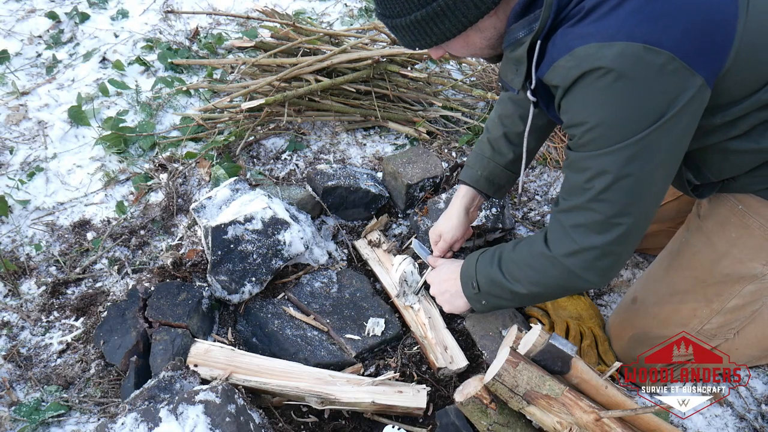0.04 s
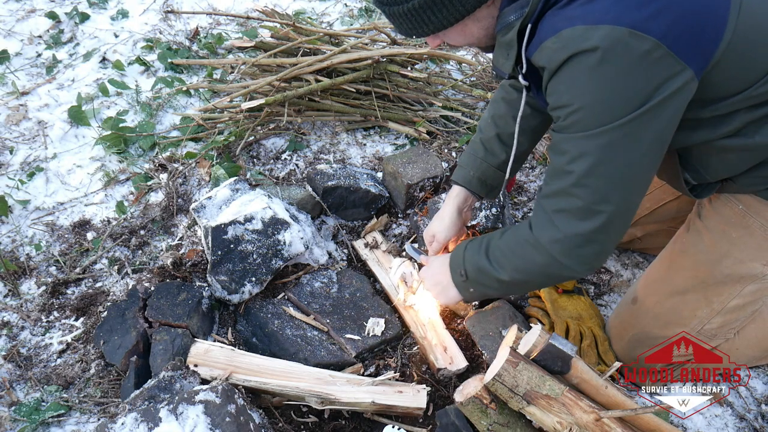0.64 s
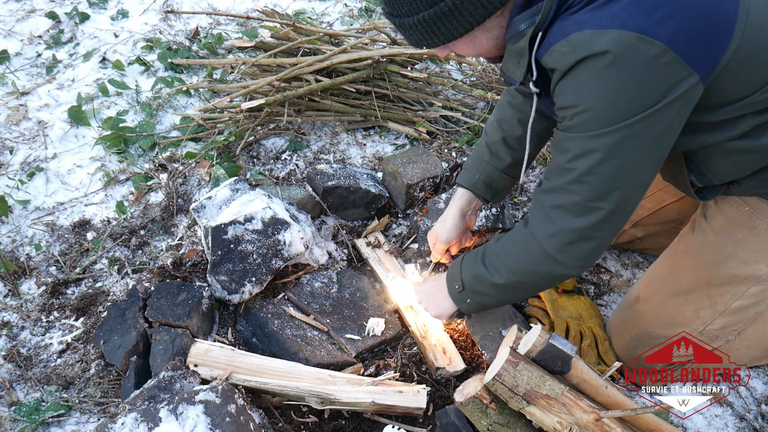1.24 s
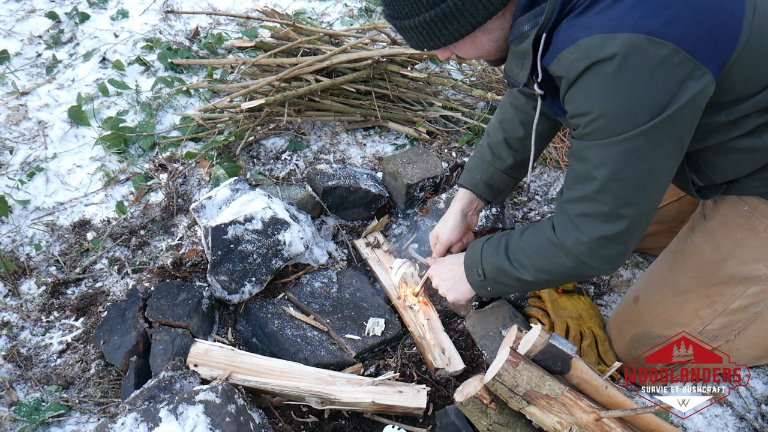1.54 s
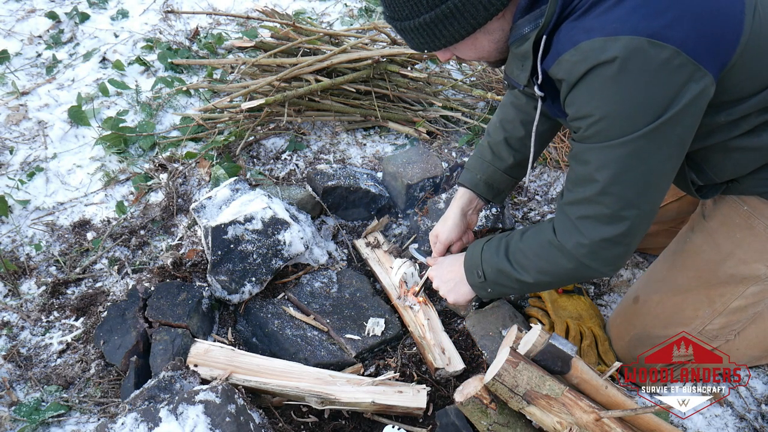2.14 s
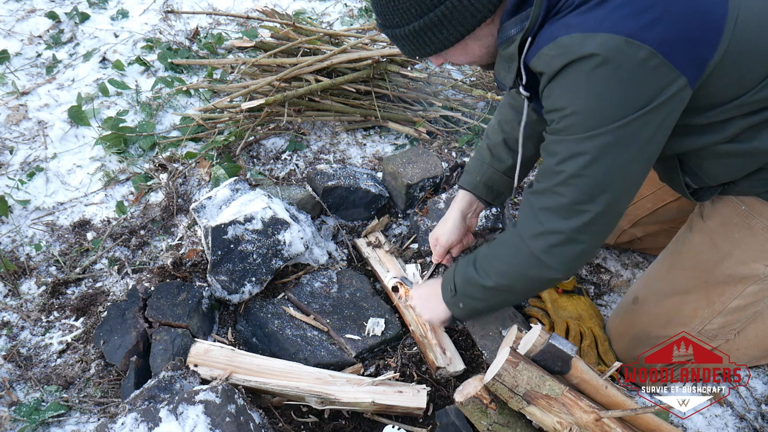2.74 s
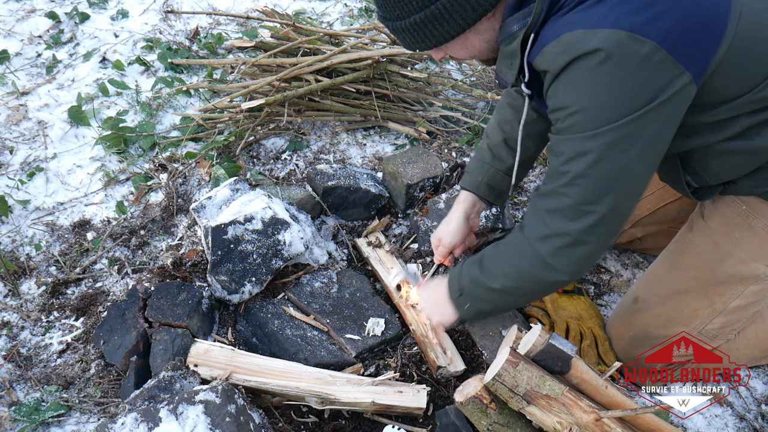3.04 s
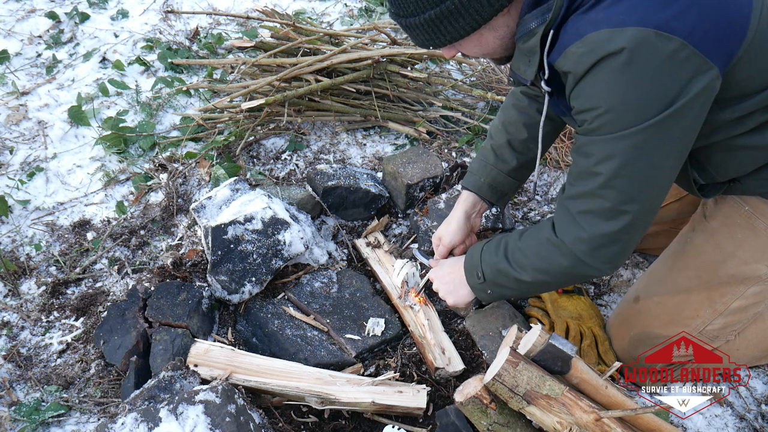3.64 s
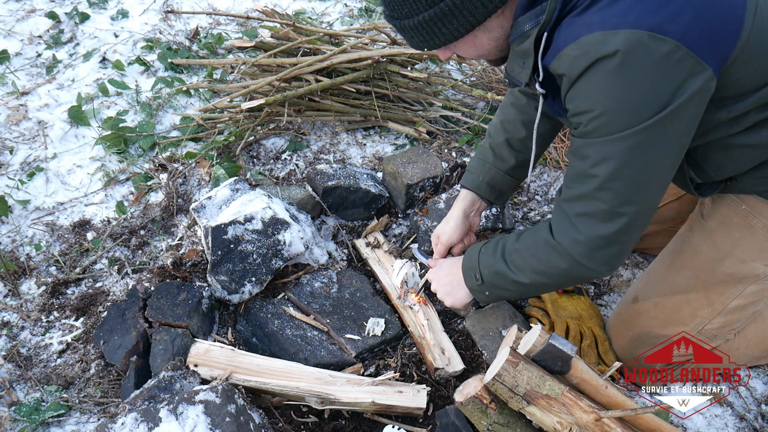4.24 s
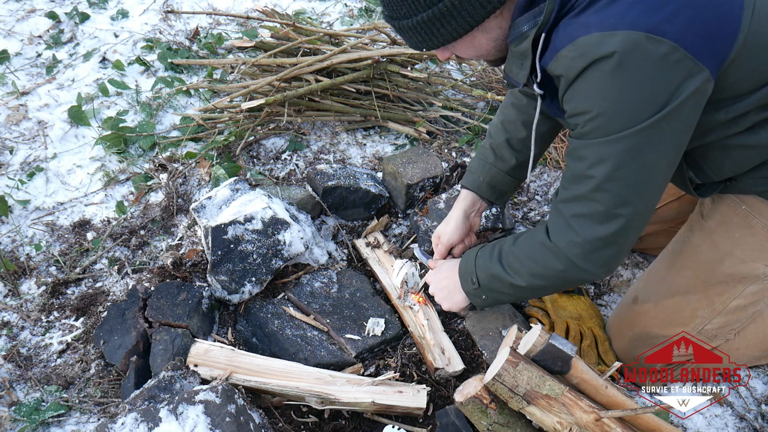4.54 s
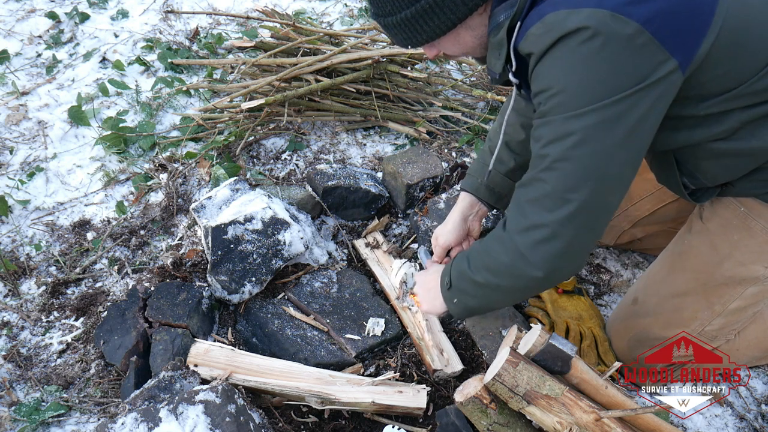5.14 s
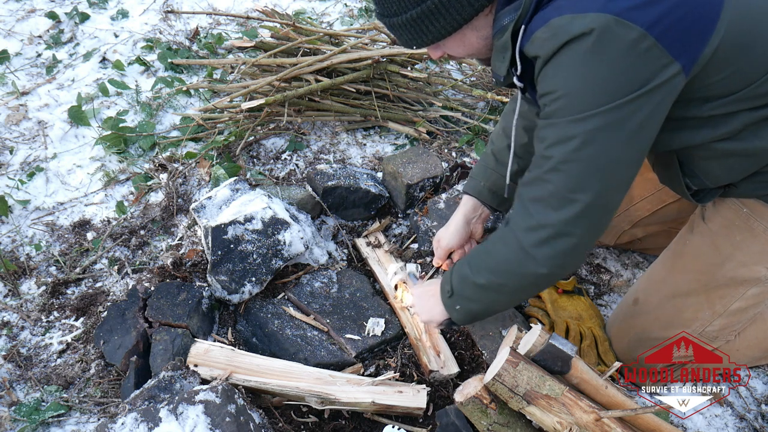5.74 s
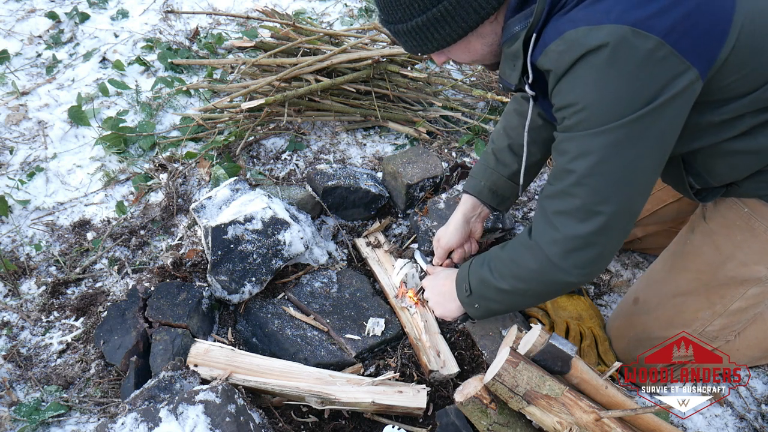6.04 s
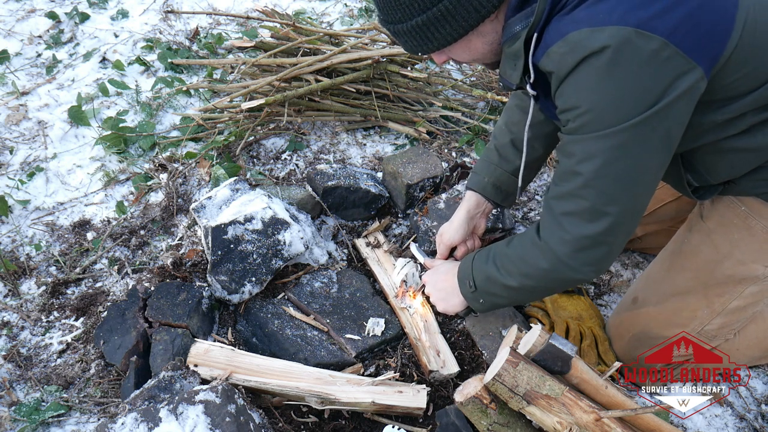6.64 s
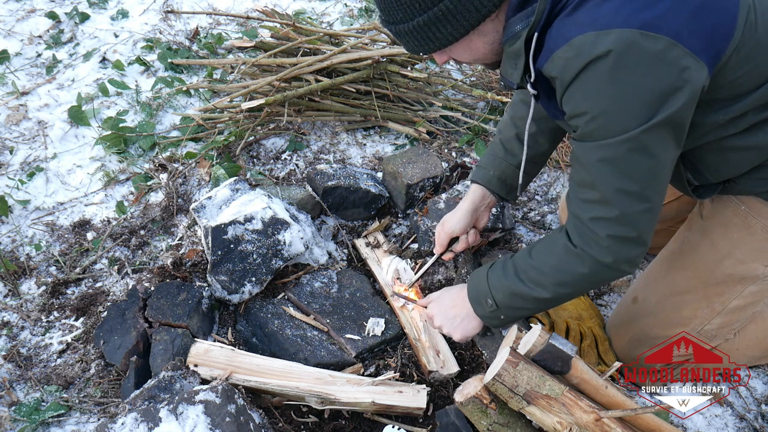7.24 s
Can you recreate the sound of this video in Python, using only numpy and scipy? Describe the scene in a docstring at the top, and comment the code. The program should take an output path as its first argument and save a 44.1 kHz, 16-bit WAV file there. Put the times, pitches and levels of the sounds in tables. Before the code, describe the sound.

Close, dry scraping of a blade shaving wood, pausing twice and ending in sharp clicks, over a faint fading wind.

```python
"""Someone kneels in a snowy wood, scraping sparks into the curls on a split stick; all is close and dry.
At first a light wind rumbles and fades while the knife rasps, judders (sticks and slips) and catches
with short knocks. Around 2 s the loose shavings tick as they settle. Near 3 s comes a second bout, with
snapping fibres and the stick bumping the ground. A sleeve shifts in the pause, and a third bout runs
from about 5 to 6 s. Last come a few sharp clicks as the knife is set against the wood."""
import sys
import numpy as np
from scipy import signal
from scipy.fft import rfft, irfft, next_fast_len
from scipy.io import wavfile
from scipy.ndimage import uniform_filter1d

SR = 44100
rng = np.random.default_rng(int(sys.argv[2]) if len(sys.argv) > 2 else 0)


def transcribe(signal):
    """Save signal, clipped to [-1, 1], as a 16-bit WAV file at the path in sys.argv[1]."""
    frames = np.atleast_2d(signal).T
    limited = np.clip(frames, -1, 1)
    pcm = np.round(limited * 32767).astype(np.int16)
    wavfile.write(sys.argv[1], SR, pcm)


N = 325899
LOW_EDGE_HZ, TOP_EDGE_HZ = 1450, 7240   # where lows, middle and treble meet


def amp(db):
    """Turn decibels into a number to multiply by."""
    return 10 ** (np.asarray(db) / 20)


def rms(x):
    """The average strength of a signal (root mean square)."""
    return np.sqrt(np.mean(x ** 2) + 1e-20)


def in_time(rows):
    """Join a table's rows with straight lines, giving each column a value at every sample."""
    s, *columns = np.transpose(rows)
    return [np.interp(np.arange(N) / SR, s, c) for c in columns]


def cut(x, hz, kind, order=4):
    """Keep the "low" or the "high" side of a frequency."""
    return signal.sosfilt(signal.butter(order, hz, kind, fs=SR, output="sos"), x + 1e-18)


def three_bands(x):
    """Split a sound into lows, middle and treble."""
    middle = cut(cut(x, LOW_EDGE_HZ, "high"), TOP_EDGE_HZ, "low")
    return cut(x, LOW_EDGE_HZ, "low"), middle, cut(x, TOP_EDGE_HZ, "high")


def colour(x, spectrum):
    """Give a sound a tone colour: make some frequencies stronger and others weaker."""
    size = next_fast_len(N + SR // 8, True) // 2 * 2
    hz, db = np.transpose(spectrum)
    bin_hz = np.arange(size // 2 + 1) * SR / size
    gain = amp(np.interp(np.log(bin_hz + 1), np.log(hz), db))
    cepstrum = irfft(np.log(gain / rms(gain)))
    cepstrum[1:size // 2] *= 2   # folded so that nothing sounds ahead of a click
    cepstrum[size // 2 + 1:] = 0
    return irfft(rfft(x, size) * np.exp(rfft(cepstrum)))[:N]


def flutter(per_s):
    """A random wavering, mostly between -1 and 1."""
    points = np.clip(rng.standard_normal(N), -2, 2)
    return np.interp(np.arange(N) / SR * per_s, np.arange(N), points)


def grit(spread_db):
    """Countless tiny breaks of very unequal size, with average strength 1."""
    x = rng.standard_normal(N) * amp(spread_db * np.minimum(rng.exponential(1, N), 6))
    return x / rms(x)


def ring(x, modes):
    """Each click starts fading tones (modes); a tone drops by 60 dB in its ring time."""
    out = 0
    for hz, db, ring_s in modes:
        decay = np.exp(-np.log(1000) / (ring_s * SR))
        turn = 2 * np.pi * hz / SR
        feedback = [1, -2 * decay * np.cos(turn), decay * decay]
        out = out + amp(db) * signal.lfilter([0, np.sin(turn)], feedback, x + 1e-18)
    return out


# tone colour of the still air: f/Hz, level/dB
AIR_COLOUR = [(12, -32.5), (20, -10.5), (68, -11), (277, -13), (347, -13.5), (446, -14), (527, -15),
              (738, -13.5), (1000, -13.5), (1090, -14), (9140, -33), (14700, -44.5), (16000, -42)]
# light wind dying away: t/s, level/dB
WIND = [(0, -40), (.4, -48.5), (1.6, -51), (3.0, -59), (7.39, -72.5)]

def outdoors(air_db=-58, wind_hz=16):
    """The even hush of the wood, and slow air rumbling on the microphone."""
    gusts = cut(rng.standard_normal(N), wind_hz, "low", order=3)
    hush = amp(air_db) * colour(rng.standard_normal(N), AIR_COLOUR)
    return hush + amp(in_time(WIND)[0]) * gusts / rms(gusts)


# tone colour of the hiss: f/Hz, level/dB
HISS_COLOUR = [(1000, -8), (4400, -0.5), (8200, -3.5), (10000, -5), (16000, -6.5)]

def hiss(level_db=-76, lowest_hz=1800):
    """The microphone's own faint, steady hiss."""
    noise = cut(colour(rng.standard_normal(N), HISS_COLOUR), lowest_hz, "high", order=1)
    return amp(level_db) * noise / rms(noise)


# a sleeve shifts: t/s, level/dB, half-length/s
SLEEVE_MOVES = [(4.175, -64, 0.05), (4.729, -52.5, 0.013), (6.847, -50.5, 0.017)]

def sleeve():
    """Jacket cloth brushes on itself in faint swells."""
    t = np.arange(N) / SR
    swell = sum(amp(db) * np.exp(-((t - s) / length) ** 2) for s, db, length in SLEEVE_MOVES)
    cloth = cut(colour(grit(spread_db=4.6), RASP_COLOUR), 2200, "high", order=2)
    return swell * cloth / rms(cloth)


# how restless the shavings are: t/s, ticks per second, level/dB
SETTLING = [(0, 4, -40), (1.6, 70, -27), (2.0, 50, -29), (2.6, 30, -34), (3.7, 3, -44), (5.9, 4, -43),
            (6.5, 22, -35), (7.39, 20, -34)]

def shavings(spread_db=3.0, lowest_hz=5000):
    """Loose, singed shavings tick thinly as they settle."""
    per_s, level = in_time(SETTLING)
    sizes = amp(level + spread_db * np.minimum(rng.exponential(1, N), 3))
    ticks = sizes * (rng.random(N) < per_s / SR)
    return cut(colour(ticks, SNAP_COLOUR), lowest_hz, "high", order=2)


# the stick is pushed and bumped against the ground: t/s, level/dB, f/Hz
THUMPS = [(0.517, -37, 80.5), (.906, -42, 48), (3.139, -26, 494), (3.147, -39, 96), (4.862, -39.5, 510),
          (5.02, -43, 46), (5.32, -37, 382), (5.332, -32, 520), (5.38, -43, 44), (5.632, -37, 76),
          (5.68, -44, 47.6)]

def thumps(swell_cycles=0.75):
    """Soft ground takes each push in a few swings that quickly die."""
    out, age = np.zeros(N), np.arange(SR // 4) / SR
    for s, db, hz in THUMPS:
        at, swell = int(s * SR), age * hz / swell_cycles
        out[at:at + len(age)] -= amp(db) * swell * np.exp(1 - swell) * np.sin(2 * np.pi * hz * age)
    return out


# fibres snap and the knife clicks: t/s, level/dB, length before stretching/s, lows/dB, brightness/dB
SNAPS = [(0.1267, -36, 0.0019, -17, 3), (0.5034, -22, 0.0026, -24, -3), (0.5803, -24, 0.0016, -8, 5),
         (0.851, -28.5, 0.0052, -3.5, -21), (0.938, -28.5, 0.0015, -8, -7),
         (1.173, -28.5, .0027, -0.5, -31), (1.607, -37, .001, -9, 0), (1.643, -39.5, 0.0014, -11, 3),
         (1.673, -39, 0.0026, -11, 8), (1.7305, -28.5, 0.0012, -10, 2), (1.762, -33, 0.0056, -7, -1),
         (1.98, -29.5, .0012, -20, -6), (2.193, -43, 0.0028, -20, 13), (2.302, -47.5, 0.0017, -12, -4),
         (2.392, -44.5, 0.0021, -5, 0), (2.4658, -35, 0.0016, -25, 3), (2.661, -36, .0011, -13, 1),
         (2.896, -25.5, 0.0029, -13, -9), (2.963, -29, 0.0064, -9.5, -2), (3.001, -20.5, .0013, -8.5, -8),
         (3.007, -26, 0.005, -14, -4), (3.325, -30.5, 0.0053, -11, -26), (3.7447, -45, 0.0018, -17, 0),
         (3.815, -44, 0.0054, -14, -6), (4.758, -42, 0.0017, -12, -18), (4.933, -28, 0.00066, -22, 7),
         (5.039, -35.5, 0.0025, -3.5, 0), (5.1553, -27, 0.0014, -7, -8), (5.441, -25.5, 0.0021, -15, -26),
         (5.542, -32.5, 0.00038, 12.5, -14), (5.6255, -23, 0.0035, -12, -27),
         (6.091, -39.5, 0.003, -19, -8), (6.421, -28.5, 0.0058, -14.5, -13), (6.4267, -26, 0.0026, -10, -8),
         (6.4604, -39, .0013, -22, -3), (6.47, -34.5, 0.0012, -7, -8), (6.706, -27.5, 0.0035, -14, -2),
         (6.7283, -30.5, .0028, -20, -4), (6.7664, -39, .001, -8, -6), (6.871, -41, 0.0027, -14, 0),
         (6.8884, -43, .0018, -24, 0), (7.1132, -19.5, 0.0053, -10.5, -16), (7.1172, -18.5, 0.0022, 0, 1),
         (7.167, -33.5, 0.0026, -13, -9), (7.1922, -28.5, 0.0044, -17, -13),
         (7.342, -21.5, 0.0022, -3.5, 0)]
# tone colour of breaking wood, also used for shavings and catches: f/Hz, level/dB
SNAP_COLOUR = [(40, -14.5), (110, -6.5), (750, -10.5), (1200, -17.5), (2350, -2), (2850, -9), (4100, -4),
               (6000, -11), (6700, -8), (8400, -5.5), (9700, -21), (12300, -12.5), (16000, -23.5)]
# tones the blade adds to a click: f/Hz, level/dB, ring time/s
BLADE_MODES = [(900, -41, 0.036), (4480, -30.5, 0.0088), (7950, -48, 0.025)]

def snaps(stretch=1.48, tail_db=-20, tail_s=0.0028, first_break=7):
    """Fibres give way for a few milliseconds: a hard first break, smaller ones, then a short rustle."""
    age = np.arange(SR // 20) / SR
    breaks = grit(spread_db=2.5)
    drives = np.zeros((3, N + len(age)))   # lows, middle, treble
    for s, db, length, lows, brightness in SNAPS:
        at = int(s * SR)
        burst = np.take(breaks, at + np.arange(len(age)), mode="wrap")
        burst[0] = -first_break
        burst *= np.exp(-(age / (stretch * length)) ** 2) + amp(tail_db) * np.exp(-age / tail_s)
        burst *= np.sqrt(length * SR / np.sum(burst ** 2))   # longer snaps carry more energy
        share = np.array([1, amp(brightness)]) / np.hypot(1, amp(brightness))
        drives[:, at:at + len(age)] += amp(db) * np.outer([amp(lows), *share], burst)
    click = signal.unit_impulse(N)
    tone = (colour(click, SNAP_COLOUR) + ring(click, BLADE_MODES))[:len(age)]
    return sum(signal.oaconvolve(drive, band / np.linalg.norm(band))[:N]
               for drive, band in zip(drives, three_bands(tone)))


# tones of knife and stick, also heard in judder and rasp: f/Hz, level/dB, ring time/s
LOW_MODES = [(1015, -4.5, 0.02), (1246, 3.5, 0.013)]
MAIN_MODES = [(2110, 5.5, 0.0038), (2184, -3.5, 0.027)]
HIGH_MODES = [(3220, 2, 0.022)]
# the edge catches: t/s, main ring level/dB, low ring against main/dB, high ring against main/dB
CATCHES = [(0.502, -18.5, -5.5, -23), (0.6172, -17, -13, -15), (1.3088, -21.5, -14, -30),
           (1.4922, -28.5, -3, -26), (2.889, -16.5, -33, -29), (3.139, -17, -4, -22),
           (3.2667, -12.5, -16, -29), (3.274, -20, -14, -26), (3.339, -21, 0.0, -5.5),
           (5.0962, -20.5, -10.5, -28), (5.1233, -29.5, -12, -8), (5.3997, -18, -10.5, -15),
           (5.4243, -21, -26, -21), (5.4437, -19, -28, -17), (5.5184, -18.5, -5, -18),
           (5.6112, -20.5, -10, -29), (5.8026, -5, -21.5, -16)]

def catches(ring_db=2.5, give_s=0.00095, crack_db=-15, crack_s=0.0031):
    """The edge bites and lets go: a small crack, and a knock as knife and stick ring briefly."""
    s, main, low, high = np.transpose(CATCHES)
    at = np.round(s * SR).astype(int)
    age = np.arange(SR // 200) / SR
    knocks = 0
    for modes, db in ((MAIN_MODES, main), (LOW_MODES, main + low), (HIGH_MODES, main + high)):
        clicks = np.zeros(N)
        clicks[at] = amp(db + ring_db)
        # a short push in step with the first tone makes the ring swell
        release = np.exp(-age / give_s) * np.cos(2 * np.pi * modes[0][0] * age) * 2 / (give_s * SR)
        knocks = knocks + ring(np.convolve(clicks, release)[:N], modes)
    bites = np.zeros(N)
    bites[at] = amp(main + crack_db)
    crack_fade = signal.lfilter([1], [1, -np.exp(-1 / (crack_s * SR))], bites + 1e-18)
    return knocks + colour(crack_fade * rng.standard_normal(N), SNAP_COLOUR)


# the edge judders: t/s, length/s, level at the end/dB, dip in the slipping rate/Hz
JUDDERS = [(.14, 0.079, -39, 1100), (.272, 0.12, -40.5, 1100), (.44, 0.058, -40, 1058),
           (.62, .07, -39.5, 953), (.692, 0.025, -41.5, 153), (0.816, 0.049, -41, 307),
           (0.961, .07, -36, 906), (1.125, 0.053, -39, 253.7), (2.69, 0.094, -40.5, 250),
           (2.922, 0.065, -34.5, 1100), (4.871, 0.054, -44.5, 748), (4.949, 0.057, -37.5, 100),
           (5.093, .073, -35.5, 904), (5.413, .07, -32.5, 845), (5.595, 0.045, -36, 99),
           (5.82, 0.065, -46.5, 905), (5.884, 0.033, -44, 400)]

def judder_course(base_hz=2175, dip_place=.64, dip_width=.4, swell_db=5, fade_s=0.00588):
    """Each judder grows louder; its rate dips as the hand bears down, then partly recovers."""
    t = np.arange(N) / SR
    rate_hz, strength = np.full(N, float(base_hz)), np.zeros(N)
    for s, length, db, dip_hz in JUDDERS:
        near = slice(*np.searchsorted(t, [s - fade_s / 2, s + length + fade_s / 2]))
        age = t[near] - s
        progress = age / length
        rate_hz[near] = base_hz - dip_hz * np.exp(-((progress - dip_place) / dip_width) ** 2)
        touching = np.clip(np.minimum(age, length - age) / fade_s + .5, 0, 1)
        strength[near] += touching * amp(db + swell_db * (progress - 1))
    return rate_hz, strength


def knife_and_stick(slips, ring_db=-24, lowest_hz=850, highest_hz=4500):
    """The slips plus the ringing they cause; the thin stick gives off no lows."""
    sound = slips + amp(ring_db) * ring(slips, LOW_MODES + MAIN_MODES + HIGH_MODES)
    return cut(cut(sound, lowest_hz, "high", order=8), highest_hz, "low", order=2)


def judder(width_hz=430, waver_db=7.0, stray_db=-5):
    """The edge sticks and slips, fast and unevenly, which shakes knife and stick."""
    rate_hz, strength = judder_course()
    uneven = cut(rng.standard_normal(N) + 1j * rng.standard_normal(N), width_hz, "low", order=2)
    slips = np.real(uneven * np.exp(2j * np.pi * np.cumsum(rate_hz) / SR))
    slips = slips / rms(slips) + amp(stray_db) * rng.standard_normal(N)   # strays miss the rhythm
    # the hand sets the loudness, whichever tone the slips happen to meet
    loudness = np.sqrt(uniform_filter1d(knife_and_stick(slips) ** 2, size=600) + 1e-12)
    waver = amp(waver_db * flutter(per_s=380))
    return knife_and_stick(slips / loudness * strength * waver)


# knife strokes: t/s of the hardest push, rise/s, fall/s, level/dB, lows/dB, brightness/dB
STROKES = [(0.208, 0.07, 0.036, -35.5, -9, -1), (0.309, 0.064, 0.097, -46, -5.5, -6.5),
           (0.506, 0.05, 0.027, -31.5, -6.5, -1), (0.578, 0.017, 0.09, -35.5, -6.5, -10),
           (0.722, 0.071, 0.041, -37, -13.5, -0.5), (0.849, 0.085, 0.028, -34, -8, -5),
           (0.956, 0.072, 0.053, -35, -8, -3.5), (1.057, 0.076, 0.071, -34.5, -4.5, -2.5),
           (1.229, 0.144, 0.11, -33.0, -8.5, -1), (1.405, 0.21, 0.17, -38.0, -8, -1),
           (1.655, 0.015, 0.02, -48, -12.5, 3.5), (1.736, 0.038, 0.1, -44.5, -9.0, 0.5),
           (1.906, 0.022, 0.026, -41, -15, 2), (1.995, 0.04, 0.018, -38.5, -15, -3.0),
           (2.031, 0.031, 0.075, -46.5, -12, 4), (2.766, 0.076, 0.046, -36.5, -8, 1.5),
           (2.9, 0.083, 0.05, -35.5, -9.5, -4), (3.021, 0.054, 0.15, -38.5, -13.0, -2.5),
           (3.139, 0.07, 0.033, -32.5, -9, -2.5), (3.219, 0.031, 0.093, -36.5, -8, -4.5),
           (3.328, 0.0083, 0.061, -44, -5, -8), (3.403, 0.016, 0.095, -39, -11.5, -5),
           (3.467, 0.04, 0.023, -35, -16.5, 3), (4.963, 0.076, 0.059, -36.5, -10.5, -2.5),
           (5.138, 0.14, 0.041, -46, -6.5, -11.5), (5.326, 0.075, 0.032, -34.5, -2, -2.5),
           (5.419, 0.16, 0.06, -42.5, -8.5, -10), (5.632, 0.086, 0.014, -34.5, -7.5, -4.5),
           (5.685, 0.023, 0.022, -36, -11, -3), (5.763, 0.055, 0.057, -38.0, -8, -7),
           (5.854, 0.017, 0.088, -51.5, -6.0, -8), (6.408, 0.037, 0.22, -57, -14, -2),
           (6.729, 0.02, 0.034, -38, -16.5, 1), (7.225, 0.15, 0.093, -44, -12, -0.5),
           (7.379, 0.022, 0.036, -36, -10.5, 1.5)]

def pressure(depth_db=12.5, rise_power=1.79, fall_power=1.24):
    """Strokes swell and let go, the strongest setting the tone; gives level, lows, brightness in dB."""
    rest_db, rest_lows_db, rest_bright_db = -73.5, -14, 0.5   # the blade lying lightly on the wood
    t = np.arange(N) / SR
    power = np.full(N, amp(rest_db) ** 2)
    lows, bright = power * rest_lows_db, power * rest_bright_db
    for s, rise, fall, db, lows_db, bright_db in STROKES:
        near = slice(*np.searchsorted(t, [s - 5 * rise, s + 5 * fall]))
        age = t[near] - s
        # slack is 0 at the hardest push, and 1 one rise before or one fall after it
        slack = np.where(age < 0, np.abs(age / rise) ** rise_power, np.abs(age / fall) ** fall_power)
        stroke = amp(db - depth_db * slack) ** 2
        power[near] += stroke
        lows[near] += stroke * lows_db
        bright[near] += stroke * bright_db
    return 10 * np.log10(power), lows / power, bright / power


# tone colour of scraping, also used for the sleeve: f/Hz, level/dB
RASP_COLOUR = [(40, -9.5), (90, -9.5), (300, -2.5), (800, -5.5), (1150, -9.5), (1800, -12), (2200, -5),
               (2800, -5.5), (4400, -6.5), (6000, -13.5), (8200, -6), (9800, -19), (12500, -10),
               (16000, -22)]

def rasp(edge_db=-2.5, rub_db=2.0, grain_db=2.5, slip_db=2.5, shift_db=3.0,
         splinters_per_s=70, splinter_db=17, sing_db=-25, sing_waver_db=4.0):
    """The edge tears across the grain: grit in small slips, lone splinters and a duller rub below."""
    level, lows, brightness = pressure()
    force = amp(level + slip_db * flutter(per_s=600))
    splinters = (rng.random(N) < splinters_per_s / SR) * amp(splinter_db)
    scrape = colour(grit(grain_db) - splinters, RASP_COLOUR)
    grip = amp(sing_db + sing_waver_db * flutter(per_s=45))
    scrape += ring(grip * grit(grain_db), MAIN_MODES)   # the main tones sing as the grip comes and goes
    # coarse and fine fibres come under the edge in turn, so each band wavers on its own
    low, middle, top = (band * amp(shift_db * flutter(per_s=110)) for band in three_bands(scrape))
    edge = middle * amp(-brightness / 2) + top * amp(brightness / 2)
    edge /= rms(cut(scrape, 2700, "high"))
    rub = amp(rub_db + lows) * low / rms(low)
    return force * (amp(edge_db) * edge + rub)


def smear(sound, level_db=-23, treble_db=-24, fade_s=0.0028, build_s=0.0031):
    """A faint, very short blur of the sound that differs between left and right."""
    age = np.arange(SR // 10) / SR
    blur = rng.standard_normal(len(age)) * np.exp(-age / fade_s) * (1 - np.exp(-age / build_s))
    blurred = signal.oaconvolve(sound, blur / np.linalg.norm(blur))[:N]
    return amp(level_db) * blurred + amp(treble_db) * cut(blurred, 6800, "high", order=2)


def scene():
    """Everything sits in the middle; only the smear and the hiss differ between left and right."""
    mid = rasp() + judder() + catches() + snaps() + thumps() + shavings() + sleeve() + outdoors()
    side = smear(mid) + hiss()
    return np.array([mid + side, mid - side])


def record(dry):
    """Cut away the very highest treble steeply."""
    cutoff_hz = 16100
    return signal.sosfilt(signal.ellip(10, .2, 80, cutoff_hz, fs=SR, output="sos"), dry)


dry = scene()
out = record(dry)
transcribe(out)
```